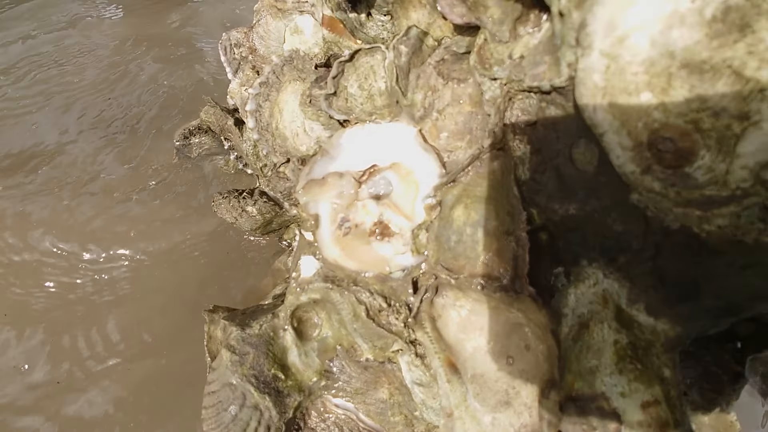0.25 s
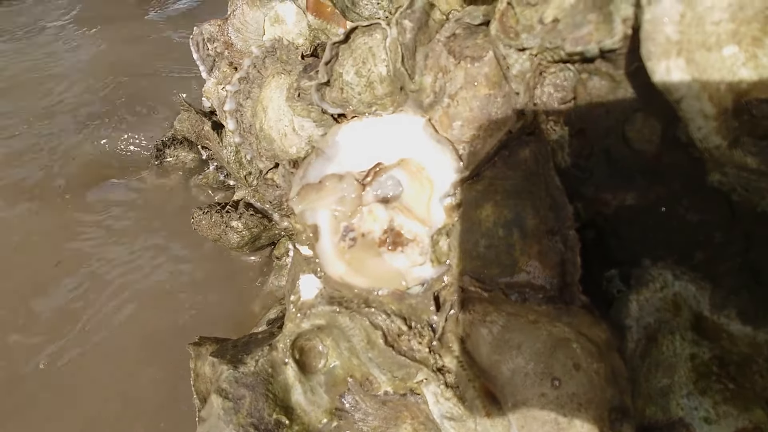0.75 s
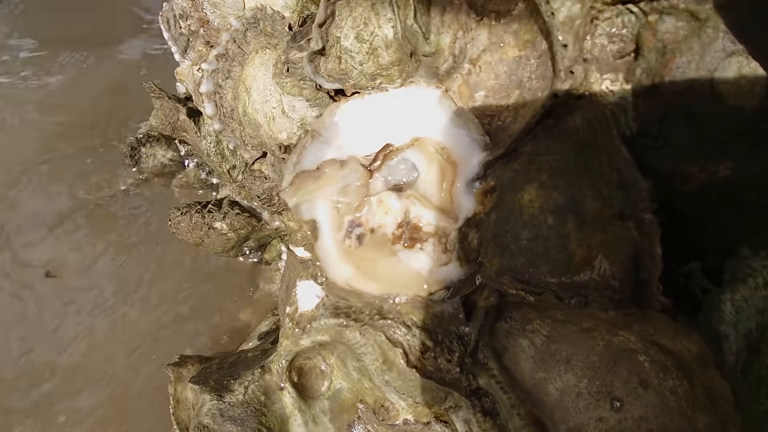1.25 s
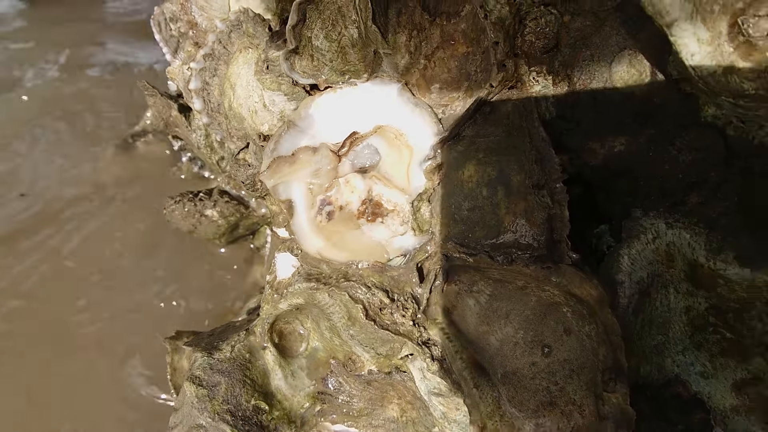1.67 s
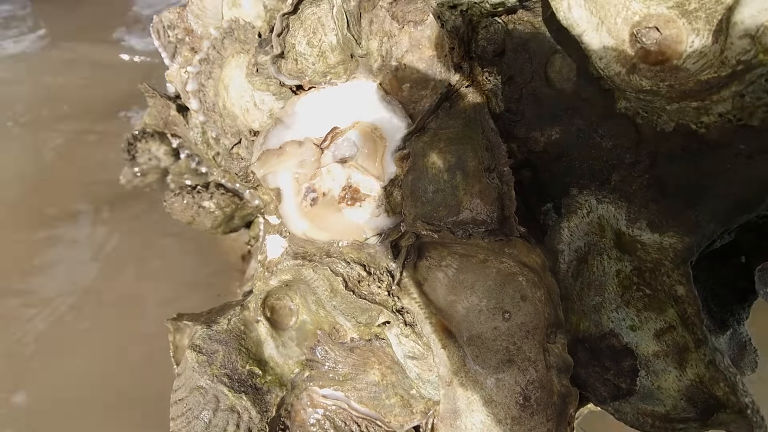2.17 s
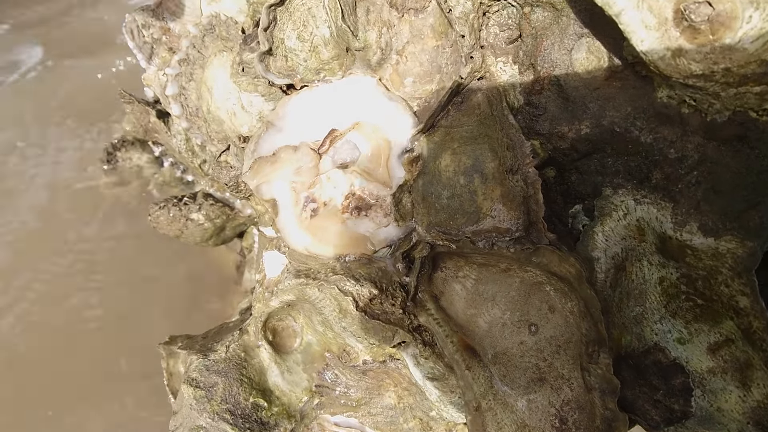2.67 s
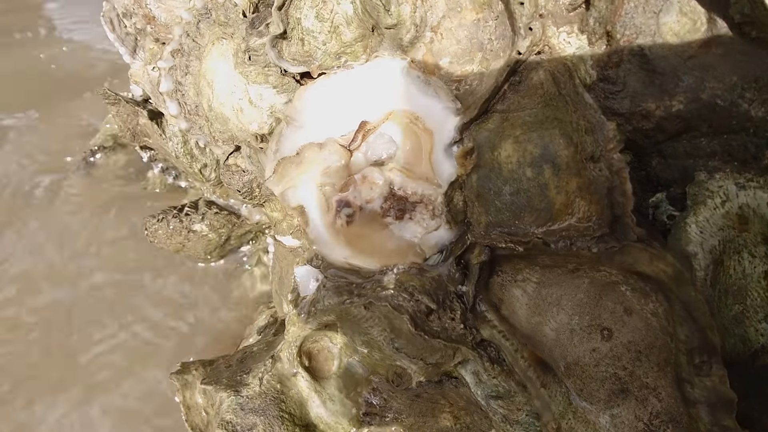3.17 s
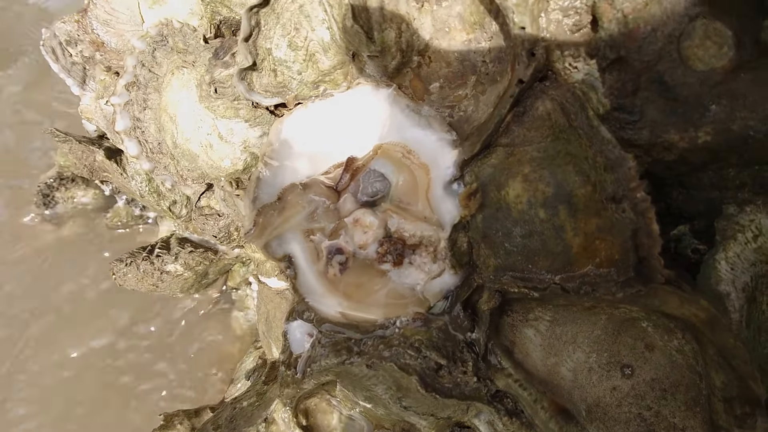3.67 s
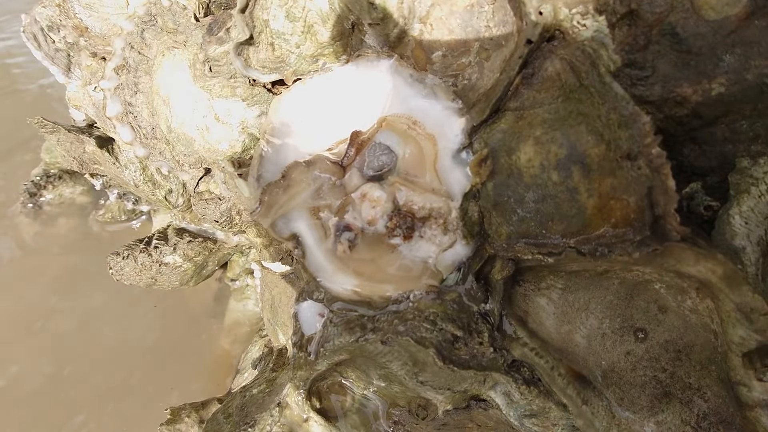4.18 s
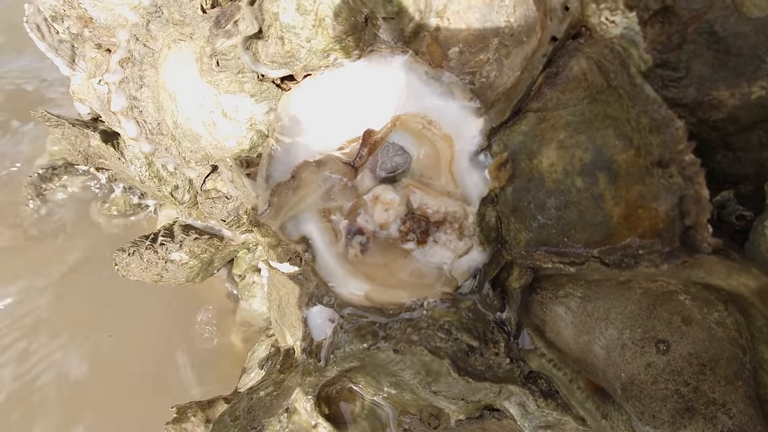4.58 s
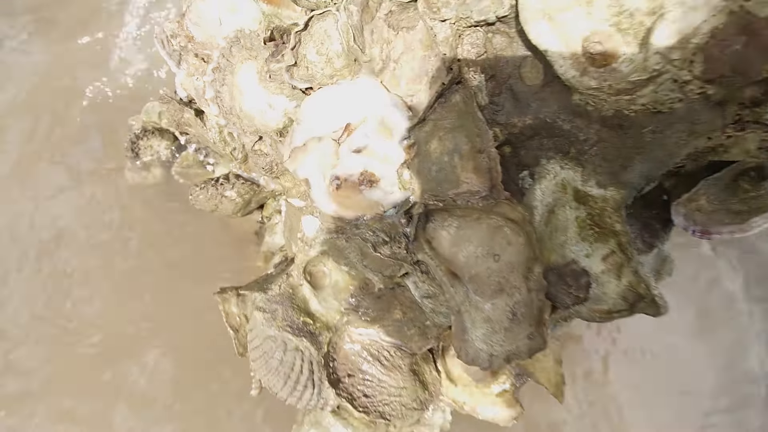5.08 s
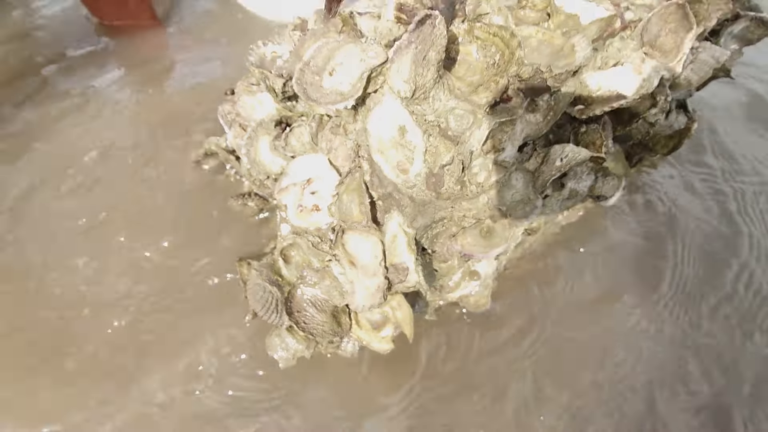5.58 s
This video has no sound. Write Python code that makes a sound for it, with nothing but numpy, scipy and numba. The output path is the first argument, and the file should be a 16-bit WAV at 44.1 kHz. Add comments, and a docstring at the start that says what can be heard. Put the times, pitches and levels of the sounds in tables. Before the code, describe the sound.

Wind buffets the microphone over lapping, bubbling water, then a metal hook taps six sharp, dry knocks on an oyster clump.

```python
"""Wind gusts rumble and thump over a phone's two microphone ports while wavelets wash over shells.
Noise and tiny rising rings make the water; single bursts of hiss and ringing bubbles stand out of it.
From 3.5 s a steel hook taps six times on a clump of oysters, louder on the right: each blow adds noise,
a knock and the rings of shell and hook. The phone's gain control briefly ducks all sound when it gets loud."""
import sys
import numpy as np
from scipy.fft import rfft, irfft, next_fast_len
from scipy.io import wavfile
from scipy.ndimage import map_coordinates
from numba import njit

SR = 44100
rng = np.random.default_rng(int(sys.argv[2]) if len(sys.argv) > 2 else 0)


def dump(signal):
    """Clip the signal to [-1, 1] and save it as 16-bit WAV at the path in sys.argv[1]."""
    limited = np.clip(np.atleast_2d(signal).T, -1, 1)
    pcm = np.round(limited * 32767).astype(np.int16)
    wavfile.write(sys.argv[1], SR, pcm)


N = 257544

# Levels are set before mixing. Left-right is how much louder the left is than the right.
# Gusts: (time [s], strength [dB], left-right [dB], sharp jolts relative to the rumble [dB])
GUSTS = [(0.0, -29.5, -7.5, -13.5), (0.36, -22, -41, -13), (0.81, -34, -4.5, -14),
         (0.93, -33.5, -20, -23.5), (1.2, -36.5, -7.5, -21), (1.43, -43.5, -13, -24),
         (1.77, -32.5, -7.0, -17), (2.02, -25, -38, -19.5), (2.57, -27.5, -23, -11.5), (2.64, -23, -3, -17),
         (2.99, -41, -13, -30.5), (3.04, -37, 2, -24), (3.5, -43.5, -19, -22), (3.74, -44, 19, -16),
         (3.85, -45, -8, -15.5), (4.63, -49.5, -3.5, -13), (4.75, -47.5, -10, -47),
         (4.88, -45.5, 21.5, -14), (5.43, -26, -7.5, -10), (5.84, -27, -24, -8.5)]
# Puffs that stand out of the gusts: (time [s], strength [dB], left-right [dB])
PUFFS = [(0.621, -28.5, -24), (0.928, -34, -22), (1.012, -26.5, -37), (1.408, -28, -37), (1.541, -29, -24),
         (1.67, -43, -30), (2.128, -47, -40), (2.242, -22, -45), (2.569, -28.5, -27), (2.729, -24.5, -30),
         (2.868, -34, -31), (2.992, -29.5, -17), (3.17, -37, -23), (3.331, -35, -22), (3.482, -25, -21),
         (3.742, -34, 17), (4.028, -40.5, -10), (4.282, -39, -24.5), (4.57, -41.5, 9), (4.85, -23.5, 19),
         (5.052, -36.5, 16.5), (5.211, -27.5, -29), (5.41, -30.5, -24.5), (5.64, -20.5, -38)]
# Strongest eddies, on the windward right port: (time [s], level [dB], pitch [Hz])
THUMPS = [(0.046, -6.5, 165), (0.092, -13, 247), (0.149, -8, 163), (0.195, -10.5, 178), (0.252, -10.5, 202),
          (0.323, -4, 165), (0.376, -8, 134), (0.414, -10.5, 139), (0.473, -4, 205), (0.489, -1, 139),
          (0.606, -15, 156), (1.0, -11, 232), (1.034, -16.5, 259), (1.88, -13.5, 250), (1.952, -4.5, 230),
          (1.978, -5.5, 149), (2.127, -6.5, 131), (2.346, -19, 235), (2.375, -11.5, 283),
          (2.388, -8.5, 141), (2.451, -4.5, 143), (2.52, -4.5, 185), (2.536, -5, 236), (2.566, -15.5, 201),
          (2.684, -5.5, 134), (2.729, -10, 187), (2.747, -10, 172), (5.197, -12.5, 172), (5.233, -9, 235),
          (5.41, -9, 127), (5.474, -5, 169), (5.536, -16, 158), (5.561, -12, 184), (5.614, -7, 169),
          (5.627, -8.5, 265), (5.64, -1.5, 212), (5.652, -12, 141), (5.68, -5, 190), (5.7, -17, 301),
          (5.731, -9.5, 177)]
# Dull buffeting noise: (frequency [Hz], relative level [dB])
RUMBLE_COLOUR = [(12, -47), (20, -17), (64, -5), (156, -14.5), (193, -20), (282, -38.5), (327, -42),
                 (400, -39.5), (520, -92), (880, -120)]
# Sharp edges of the buffeting: (frequency [Hz], relative level [dB])
JOLT_COLOUR = [(120, -52), (200, 3.5), (300, 3), (500, -8), (900, -30), (1800, -50)]

# Moving water: (time [s], gurgle [dB], crackle [dB], fizz [dB], left-right [dB])
WASH = [(0.0, -45.5, -45.5, -56, -5), (0.1, -54.5, -60.5, -63.5, 0), (0.32, -52, -56.5, -62.5, -6),
        (0.52, -45.5, -53.5, -58, 3.5), (0.68, -47, -45, -57.5, -5.5), (1.02, -52.5, -57.5, -62.5, -3.5),
        (1.22, -50, -64.5, -65, -2.5), (1.4, -43, -48.5, -54.5, -7), (1.64, -54.5, -61.5, -65.5, -3.5),
        (1.95, -53, -66.5, -66.5, -4.5), (2.23, -51.5, -57, -61.5, -1), (2.5, -48.5, -57, -66, -4.5),
        (2.71, -54, -63, -62, -11), (2.96, -56, -66, -67.5, 4), (3.38, -50.5, -56.5, -59.5, -5.5),
        (3.56, -54, -62.5, -65, -6.5), (3.74, -45.5, -54, -59.5, 1), (3.87, -51, -55, -65, -17),
        (3.92, -51.5, -58.5, -61, -6.5), (4.33, -52.5, -58.5, -66, 0.5), (4.49, -49, -51, -59.5, -20.5),
        (4.57, -55, -59.5, -62.5, -3), (4.65, -42, -49, -63, -11), (4.85, -53.5, -67, -65, -3.5),
        (5.01, -53.5, -59, -61.5, -12.5), (5.48, -50.5, -64.5, -65, -7.5), (5.77, -61, -71, -70.5, 2),
        (5.84, -55, -80, -75.5, -3)]
# Wavelets breaking on the shells: (time [s], lift of the wash [dB], half length [s])
WAVES = [(0.716, 6.5, 0.053), (1.432, 5, 0.036), (2.287, 4, 0.04), (3.133, 3.5, 0.024), (3.282, 6, 0.048),
         (3.742, 0.5, 0.024), (4.285, 9, 0.056), (5.036, 2.5, 0.11)]
# Low gurgle: (frequency [Hz], relative level [dB])
GURGLE_COLOUR = [(210, -43), (350, 2), (548, -7), (1290, -1.5), (1650, 0), (2310, -4.5), (2660, -10.5),
                 (3100, -11), (4000, -11.5), (5200, -44), (8800, -120)]
# Rush under the crackle: (frequency [Hz], relative level [dB])
SPRAY_COLOUR = [(1800, -43), (2800, -6.5), (4500, -7.5), (6500, -13.5), (9000, -21)]
# High fizz and hiss: (frequency [Hz], relative level [dB])
FOAM_COLOUR = [(2940, -34), (5000, -1), (5740, -11), (6500, -2.5), (8000, -7), (15100, 2), (15900, 8),
               (16300, -28)]
# How late the water reaches the left port; below zero the right is late: (time [s], delay [s])
LEFT_DELAY = [(0, 0.0003), (3.4, 0.0005), (3.6, -.0004), (5.84, -0.0003)]
# Clear bursts of foam and drops: (time [s], hiss level [dB], splat over the hiss [dB], left-right [dB])
SPITS = [(0.039, -21.5, -8.5, -10), (0.166, -42, 1, -12), (0.22, -45, 1, -18), (0.268, -32.5, -3, -5),
         (0.356, -37, -3, 3), (0.384, -23.5, -22, -26), (0.409, -28.5, -6, -9), (0.429, -37, -2, -20),
         (0.545, -45, 8, 4), (0.598, -30.5, -3, 0), (0.681, -29, 1.5, -4), (0.71, -38, 6.5, -4),
         (0.773, -43.5, 10, -11), (0.821, -34, -9, -8), (0.831, -33, -1, -2), (0.848, -39, 2, -4),
         (1.09, -44, 3.5, -14), (1.138, -31.5, -17, 8), (1.182, -40.5, 0, -5), (1.243, -32, -27, -15),
         (1.271, -36, -11, -21), (1.285, -39, -10, -23), (1.369, -32, 0.5, -13), (1.447, -29, -0.5, -6),
         (1.469, -34, 4.5, -7), (1.58, -46.5, 4, -26), (1.65, -32, -31, 8), (1.814, -46.5, 5, -16),
         (1.83, -43, -18, -18), (2.007, -47, -14, -9), (2.084, -52, -18, -21), (2.181, -43.5, -4, -10),
         (2.397, -38, -4, -20), (2.062, -37, -7, -6), (2.106, -36.5, -9, -16), (2.117, -33.5, -28, -19),
         (2.159, -36, -23, -16), (2.249, -32.5, 1, -13), (2.287, -30.5, -7, -20),
         (2.412, -29.5, -11, -15.5), (2.445, -41.5, -16, -4), (2.519, -41.5, -9, -0.5),
         (2.535, -40, -25, 13), (2.698, -41, -2.5, 2), (2.628, -24, -4.5, -14), (2.937, -41, -6, -12),
         (2.956, -37.5, -8, 8), (2.973, -45, -6, -17), (3.041, -48, -17, -3), (3.092, -38.5, -17, -15),
         (3.118, -34.5, -7, -18), (3.197, -36.5, -10, 19), (3.247, -30.5, -10, -12.5),
         (3.274, -33.5, -0.5, -23), (3.305, -37, -5, -25), (3.383, -35.5, -15, -29),
         (3.468, -56, -9, -21.5), (3.611, -40.5, -14, 6), (3.653, -63.5, 22.5, -3),
         (3.673, -35.5, -12, -23.5), (3.693, -41.5, 8.5, -2), (3.765, -35.5, -10, -16),
         (3.954, -58, 21.5, -10), (3.965, -38, -9, -23), (4.04, -42.5, 15, -11), (4.195, -40.5, 5.5, -6),
         (4.248, -40.5, -19, -14), (4.275, -33.5, 4, 5), (4.495, -35, -0.5, -16), (4.505, -34, -6, -24.5),
         (4.535, -34, -33.5, -12), (4.745, -43, 4, 3), (4.822, -64.5, 26, 7), (5.045, -45.5, -2, -25),
         (5.07, -44.5, 7, -20), (5.107, -43.5, 5, -12), (5.152, -43, -8, -24), (5.407, -43, -1, -25),
         (5.447, -46.5, 4, 1), (5.536, -41, -24, -11), (5.584, -29.5, -1, -6.5), (5.618, -40, -8, -7)]
# Ringing bubbles: (time [s], level [dB], basic pitch [Hz], fading scale [s],
#                   pitch rise [share of basic pitch], left-right [dB])
BUBBLES = [(0.415, -35, 825, .026, 0.25, 15), (0.431, -27.5, 517, 0.029, 0.11, -14),
           (0.523, -31.5, 1260, 0.031, 0, 0), (0.547, -28.5, 1850, 0.03, 0.27, -5),
           (0.58, -34, 930, 0.043, 0.3, 2), (0.637, -37, 478, 0.066, .1, -4),
           (0.663, -29.5, 485, 0.11, 0.23, -7), (0.663, -32.5, 1340, 0.054, 0, -12),
           (0.707, -30, 940, 0.041, 0.088, 10), (0.826, -36, 5480, .04, 0.12, 3),
           (0.837, -37, 2340, 0.038, 0, 4), (0.885, -40.5, 507, 0.11, 0.17, -12),
           (1.157, -29, 790, 0.016, 0.38, 7), (1.21, -33.5, 689, 0.017, .02, 8),
           (1.245, -42, 455, 0.18, 0.44, -24), (1.371, -26.5, 555, 0.02, 0, -7),
           (1.438, -28, 1637, 0.033, 0, -19), (1.439, -31, 600, 0.041, 0.13, -4),
           (1.45, -33, 1025, 0.023, 0.049, 17), (1.462, -39, 500, 0.046, .05, -17),
           (2.098, -39.5, 766, 0.15, 0.14, -7), (2.196, -22, 1910, 0.025, 0.22, -4),
           (2.251, -36, 861, 0.037, 0, -3), (2.281, -33.5, 416, 0.37, 0.21, -15),
           (2.29, -28.5, 2270, 0.021, 0, -4), (3.126, -34, 743, 0.09, 0, -10),
           (3.2, -33.5, 1870, 0.025, .2, 0), (3.225, -46, 387, 0.22, .19, -18),
           (3.272, -38.5, 431, 0.19, 0.41, -10), (3.277, -33, 1770, .03, 0.23, -4),
           (3.335, -29.5, 586, 0.033, 0.34, -8), (3.348, -39, 684, .13, 0, -7),
           (3.392, -38, 428, 0.19, 0.82, -12), (3.433, -33, 790, 0.053, 0.094, -7),
           (3.654, -26, 1430, 0.015, 0.079, -3), (3.707, -29.5, 2600, 0.016, .14, 13),
           (3.758, -30.5, 970, 0.04, 0.5, 7), (3.846, -31.5, 1520, .025, .08, -24),
           (3.888, -25, 596, 0.0058, 0.024, -23), (3.915, -43, 542, .11, 0.3, -20),
           (3.995, -34.5, 454, 0.19, .45, -14), (4.229, -38.5, 483, .03, 0.017, 5),
           (4.29, -28.5, 510, 0.017, .14, 1), (4.337, -39, 523, 0.048, .07, 11),
           (4.464, -27, 797, 0.021, 0.078, -12), (4.467, -35, 510, 0.026, 0.12, -7),
           (4.489, -31.5, 1470, .026, 0.069, -29), (4.615, -23, 426, 0.019, 0, 0),
           (5.318, -23.5, 394, 0.011, 0.17, 27)]

# Hook on shell, with bounces: (time [s], level [dB], knock [dB], left-right [dB], shell ring [dB],
#                               hook low rings [dB], hook high rings [dB], crack's fall by 60 dB [s])
TAPS = [(3.5105, -4, -14, -0.5, 2.5, -13, -24, 0.023), (3.5302, -22, -10, -3, -14, -17, -11, 0.016),
        (3.8017, -9.5, -6.5, -4, -21, -2, -0.5, 0.031), (3.828, -25.5, 0, -5, 0, -2, -15, 0.016),
        (3.8485, -32, -4, -14, -17, -21, -3, 0.024), (4.078, -7, -8.5, -3, -6.5, -5.5, 3, 0.024),
        (4.1118, -31, -1, -3, 0, -3, -10, 0.012), (4.361, -1, -12.5, -8, -10, -6.5, 2.5, 0.0087),
        (4.39, -17.5, -7.5, -6.5, -7, -6, -0.5, 0.02), (4.6337, -1.5, -17, -4, -25, -12, -12, 0.018),
        (4.6575, -28, -24, -2, -4, -8, -24, 0.02), (4.9083, -6, -22.5, -6.5, -4.5, -6, -21, 0.034),
        (4.92, -17, -37, 4, -15, -6, -13, 0.041), (4.9315, -18, -19, -5, -20, -17, -8, 0.023),
        (4.941, -38.5, 8.5, 7, -7, -7, -14, 0.013)]
# Ringing tones of the hook: (pitch [Hz], level [dB], fall by 60 dB [s])
HOOK_MODES = [(1617, -17, 0.025), (2776, -6, .045), (4210, -4, 0.034), (5830, -5, 0.03), (7730, -15, .028),
              (9440, -18, 0.025), (11830, -16, 0.02)]
# Ringing tones of the struck shell: (pitch [Hz], level [dB], fall by 60 dB [s])
SHELL_MODES = [(2010, -4.5, .022), (3370, -2.5, 0.024), (4780, -7, 0.023), (6600, -7, 0.021)]
# Noise of the crack: (frequency [Hz], relative level [dB])
CRACK_COLOUR = [(470, -55), (800, -17.5), (3330, -0.5), (5240, -2.5), (5790, -7.5), (6330, -9),
                (8150, -5.5), (11600, -12.5), (14900, -3), (16300, -17)]
# Colour of the left port: (frequency [Hz], gain [dB])
LEFT_PORT = [(20, -1), (300, 2.5), (700, 3.5), (2400, -3.5), (6800, -8.5), (9000, -1.5), (13000, 2.5),
             (22000, -19)]

LUMP_DB, LUMP_RATE, JOLT_SWING_DB = 1.5, 10, 4  # gust lumps: depth, random points per s; swing of the jolts
PUFF_S = 0.024  # half length of a puff
CHURN_DB = 1.3  # depth of the churning shared by both sides
SMALL_SPITS, SMALL_SPIT_DB = 20, 19  # count of faint random bursts; their middle level over the fizz
MODE_SCATTER_DB = 2  # each blow rings each tone a little differently
# Hard contact: level over the knock, half width, delay after first touch
CONTACT_DB, CONTACT_S, CONTACT_LATE_S = 2, 0.000096, 0.001165
TOP_HZ = 16500  # nothing is heard from here up


def amp(db):
    """Turns decibels into a gain."""
    return 10 ** (np.asarray(db) / 20)


def unit(x):
    """Scales a sound to an average strength (rms) of 1."""
    return x / np.sqrt(np.mean(x ** 2, axis=-1, keepdims=True) + 1e-20)


def curves(rows):
    """One value per sample for each column after the time."""
    s, *cols = np.transpose(rows)
    return [np.interp(np.arange(N) / SR, s, c) for c in cols]


def sides(pan_db):
    """Left and right gains whose summed power stays the same at any balance."""
    left = amp(pan_db)
    return np.array([left, np.ones_like(left)]) * 2 / np.sqrt(1 + left ** 2)


def wobble(rate):
    """Two unrelated smooth random curves through rate points a second."""
    points = rng.standard_normal((2, int(N * rate / SR) + 4))
    return np.array([map_coordinates(p, [np.arange(N) * rate / SR]) for p in points])


def chatter(depth_db, rate, t):
    """A fast random gain with rate random points a second."""
    return amp(depth_db * np.interp(t * rate, np.arange(len(t)), rng.standard_normal(len(t))))


def gain_at(points, hz):
    """Gain of (frequency [Hz], level [dB]) points joined on a log axis, shut outside them."""
    f, db = np.transpose(points)
    return amp(np.interp(np.log(hz + 1), np.log(f + 1), db, left=-120, right=-120))


def coloured(x, spectrum):
    """Filters x through a spectrum and brings it to rms 1."""
    n = x.shape[-1]
    m = next_fast_len(n + min(n, 8192))
    return unit(irfft(rfft(x, m) * gain_at(spectrum, np.fft.rfftfreq(m, 1 / SR)), m)[..., :n])


def lag(s):
    """Seconds by which the left port hears the water late, a little different for each drop."""
    return np.interp(s, *np.transpose(LEFT_DELAY)) + rng.normal(0, 0.0001, np.shape(s))


def add(out, s, sound, pan_db, lag_s):
    """Mixes one event in; one port hears it later."""
    delays = (max(lag_s, 0), max(-lag_s, 0))
    for side, gain, late in zip(out, sides(pan_db), delays):
        side[round((s + late) * SR):][:len(sound)] += gain * sound


def wind():
    """Eddies buffet each port separately: a lumpy rumble, small sharp jolts and single strong thumps."""
    db, pan_db, jolt_db = curves(GUSTS)
    strength = amp(db) * sides(pan_db) * unit(amp(LUMP_DB * wobble(LUMP_RATE)))
    for s, level_db, side_db in PUFFS:
        first = max(round((s - 3 * PUFF_S) * SR), 0)
        last = min(round((s + 3 * PUFF_S) * SR), N)
        near = np.arange(first, last)
        swell = np.exp(-((near / SR - s) / PUFF_S) ** 2)
        strength[:, near] += amp(level_db) * sides(side_db)[:, None] * swell
    rumble = coloured(amp(1.74 * wobble(30)) * rng.standard_normal((2, N)), RUMBLE_COLOUR)
    clicks = (rng.random((2, N)) < 190 / SR) * rng.uniform(-1.2, 1, (2, N))  # about 190 a second
    jolts = coloured(clicks, JOLT_COLOUR) * amp(jolt_db + JOLT_SWING_DB * wobble(14))
    thumps, t = np.zeros((2, N + SR)), np.arange(-400, 900) / SR
    for s, level_db, hz in THUMPS:
        turns = hz * t
        swell = np.exp(-(turns / np.where(t < 0, .2, .65)) ** 2)  # steep front, slower rebound
        push = np.cos(2 * np.pi * turns - .7) * swell
        thumps[1, round(s * SR) - 400:][:len(t)] += rng.choice([-1, 1]) * amp(level_db) * push
    return strength * (rumble + jolts) + thumps[:, :N]


def grains(rate, hz, spread, cycles, scatter_db, size):
    """Many short fading, rising tones at random moments, pitches and places, rms 1."""
    row = rng.random((int(rate * N / SR), 4))
    pitch = np.clip(hz * np.exp(spread * 3.65 * (row[:, 1:2] - .5)), 200, SR / 2.6)
    turns = pitch * np.arange(size) / SR
    tone = np.sin(2 * np.pi * turns * (1 + 0.027 * turns / cycles))
    rings = tone * np.exp(-turns / cycles) * (1 - np.exp(-turns))
    rings *= amp(-scatter_db * np.log(row[:, 2:3] + 0.0013))
    start = row[:, :1] * (N - 64) + 32
    gains = sides(14 * (row[:, 3:] - .5))
    late = lag(start / SR) * SR / 2  # half the delay on each side, in samples
    mixed = []
    for gain, shift in zip(gains, (late, -late)):
        places = (start + shift).astype(int) + np.arange(size)
        mixed.append(np.bincount(places.ravel(), (gain * rings).ravel(), N)[:N])
    return unit(np.array(mixed))


def rush(spectrum, rate):
    """Soft, unsteady noise of moving water."""
    return coloured(rng.standard_normal((2, N)), spectrum) * amp(2.6 * wobble(rate))


def water():
    """Three sizes of bubble, each over its own soft rush: gurgle, crackle and the fizz of foam."""
    gurgle_db, crackle_db, fizz_db, pan_db = curves(WASH)
    big = grains(260, hz=1221, spread=0.526, cycles=5.3, scatter_db=2.5, size=700)
    middle = grains(350, hz=3895, spread=0.301, cycles=5.8, scatter_db=3.5, size=250)
    tiny = grains(560, hz=11200, spread=0.25, cycles=3, scatter_db=2.5, size=80)
    gurgle = amp(-4) * rush(GURGLE_COLOUR, 25) + amp(-0.5) * coloured(big, GURGLE_COLOUR)
    crackle = amp(-7.0) * rush(SPRAY_COLOUR, 30) + amp(-1.0) * middle
    fizz = amp(-1.5) * rush(FOAM_COLOUR, 40) + amp(-3) * coloured(tiny, FOAM_COLOUR)
    t = np.arange(N) / SR
    breaks_db = sum(lift_db * np.exp(-((t - s) / half_s) ** 2) for s, lift_db, half_s in WAVES)
    churn = amp(CHURN_DB * wobble(12)[0] + breaks_db)
    mix = amp(gurgle_db) * gurgle + amp(crackle_db) * crackle + amp(fizz_db) * fizz
    return churn * sides(pan_db) * mix


def spits():
    """Each burst is a very short hiss over a duller splat; fainter ones pop at random in the foam."""
    out, t = np.zeros((2, N + SR)), np.arange(2048) / SR
    when, *_, fizz_db, wash_pan_db = np.transpose(WASH)
    small = []
    for s, a, b, c in rng.random((SMALL_SPITS, 4)) * [N / SR, 1, 1, 1]:
        level_db = np.interp(s, when, fizz_db) + SMALL_SPIT_DB + 8 * (a - .5)
        small.append((s, level_db, 20 * (b - .5), np.interp(s, when, wash_pan_db) - 14 * c))
    for s, db, splat_db, pan_db in SPITS + small:
        a, b = rng.standard_normal((2, len(t)))
        hiss = coloured(a, FOAM_COLOUR) * amp(-60 * t / 0.016)
        body = coloured(b, [(1200, 0.5), (1800, 3.5), (4500, -3.0), (6500, -14)])
        splat = body * amp(splat_db - 60 * t / 0.032)
        add(out, s, amp(db) * (hiss + splat) * (1 - np.exp(-t / 0.00071)), pan_db, lag(s))
    return out[:, :N]


def bubbles():
    """A bubble rings, often at a pitch that climbs as it nears the surface, fluttering in the churn."""
    out, t = np.zeros((2, N + SR)), np.arange(SR // 6) / SR
    for s, db, hz, fade_s, rise, pan_db in BUBBLES:
        flutter = chatter(4.7, 0.18 * hz + 30, t)  # small, high bubbles flutter faster
        age = np.minimum(t / (0.32 * fade_s), 2.5)
        pitch = hz * (.97 + rise * age ** 1.32)
        fade = amp(-13 * (t / (.22 * fade_s)) ** 1.4)
        ring = np.sin(2 * np.pi * np.cumsum(pitch) / SR) * fade * (1 - np.exp(-t / 0.00043))
        add(out, s, amp(db) * flutter * ring, pan_db, lag(s))
    return out[:, :N]


def ringing(modes, t):
    """Fading tones at slightly new strengths and phases, roughened by the grinding contact."""
    total = 0
    for hz, level_db, t60 in modes:
        fade = amp(level_db + rng.normal(0, MODE_SCATTER_DB) - 60 * t / t60)
        total = total + fade * chatter(1.8, 520, t) * np.sin(2 * np.pi * (hz * t + rng.random()))
    return total


def taps():
    """Each contact cracks, knocks the clump and rings shell and hook; the spot struck sets which tones lead."""
    out, t = np.zeros((2, N + SR)), np.arange(SR // 12) / SR
    for s, db, knock_db, pan_db, shell_db, low_db, high_db, crack_t60 in TAPS:
        shared = rng.standard_normal((2, len(t)))
        for side, gain, late in zip(out, sides(pan_db), (0, .0004)):  # right port 0.4 ms later
            shell = amp(shell_db) * ringing(SHELL_MODES, t)
            hook = amp(low_db) * ringing(HOOK_MODES[:2], t) + amp(high_db) * ringing(HOOK_MODES[2:], t)
            grit = shared + 3.1 * rng.standard_normal((2, len(t)))
            crack_fade = amp(-9.5 - 60 * t / crack_t60) + amp(-17.5 - 60 * t / 0.042)  # crack, then crumble
            crack = crack_fade * coloured(grit[0], CRACK_COLOUR)
            thud = coloured(grit[1], [(250, -6.0), (500, -17.5), (1200, 2.5), (1700, 1.0)])
            knock = amp(knock_db - 60 * t / 0.013) * thud
            contact = amp(knock_db + CONTACT_DB) * np.exp(-((t - CONTACT_LATE_S) / CONTACT_S) ** 2)
            blow = (shell + hook) * (1 - np.exp(-t / 0.0025))
            blow = blow + (crack + knock) * (1 - np.exp(-t / 0.00074)) + contact
            side[round((s + late) * SR):][:len(t)] += gain * amp(db + 1.5) * blow
    return out[:, :N]


def scene():
    """Adds all layers, from the background to the taps."""
    return wind() + water() + spits() + bubbles() + taps()


@njit
def ducking(over_db, attack_s, hold_s, release_db):
    """Gain cut in dB: rises fast toward the excess level, holds, then lets go at release_db a second."""
    cut, now, wait = np.zeros(len(over_db)), 0.0, 0.0
    for i in range(len(over_db)):
        if over_db[i] > now:
            now += (over_db[i] - now) / (attack_s * SR)
            wait = hold_s
        elif wait > 0:
            wait -= 1 / SR
        else:
            now = max(now - release_db / SR, 0.0)
        cut[i] = now
    return cut


def record(dry):
    """Left port's colour, gain control shared by both sides and less alert to bass, soft overload, band limit."""
    hz = np.fft.rfftfreq(N, 1 / SR)
    left = irfft(rfft(dry[0]) * gain_at(LEFT_PORT, np.clip(hz, 30, 20000)), N)
    ports = np.array([left, dry[1]])
    heard = irfft(rfft(ports) * hz ** 2 / (hz ** 2 + 500 ** 2), N)  # bass weakened for the gain control
    over_db = 20 * np.log10(np.abs(heard).max(axis=0) + 1e-9) + 10  # excess over -10 dB
    ducked = ports * amp(-ducking(over_db, 0.00063, 0.077, 280.0))
    softened = ducked / (1 + np.abs(ducked) ** 4) ** (1 / 4)
    return irfft(rfft(softened) * (hz < TOP_HZ), N)


dry = scene()
out = record(dry)
dump(out)
```